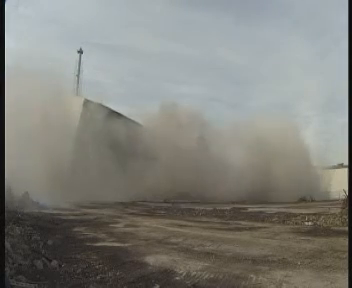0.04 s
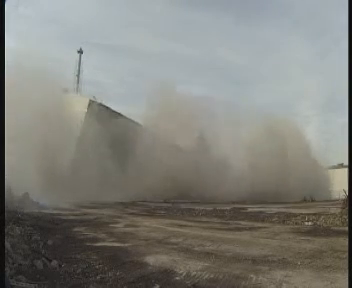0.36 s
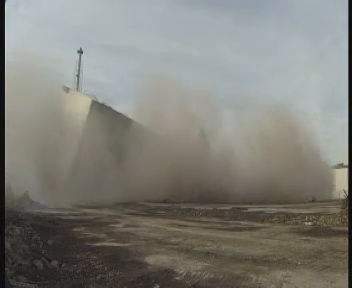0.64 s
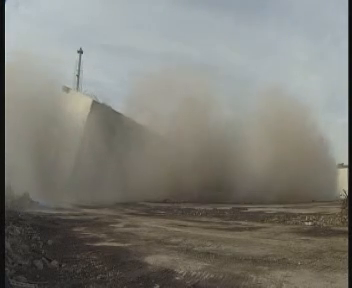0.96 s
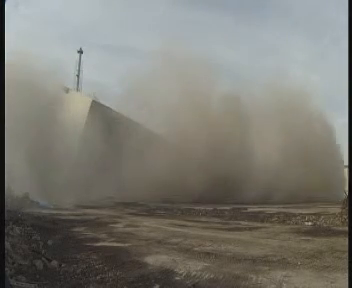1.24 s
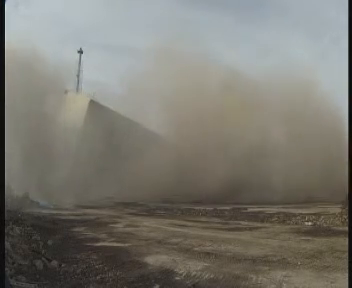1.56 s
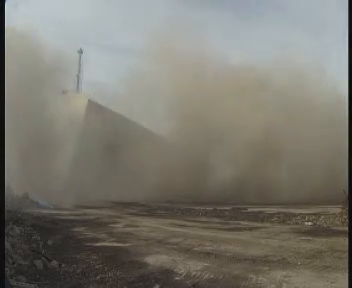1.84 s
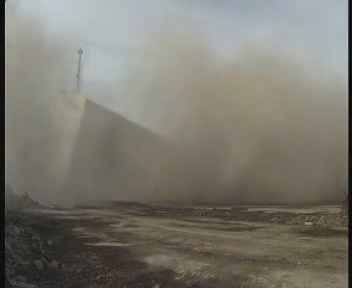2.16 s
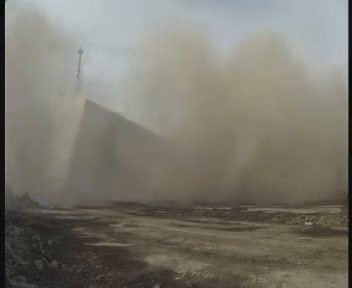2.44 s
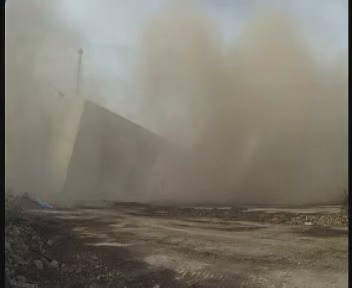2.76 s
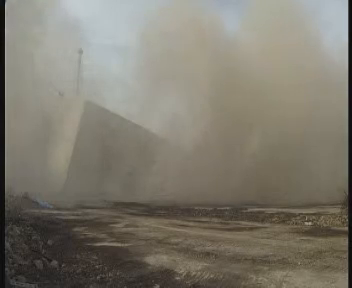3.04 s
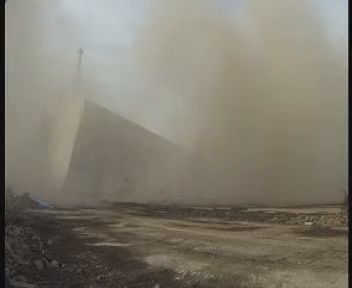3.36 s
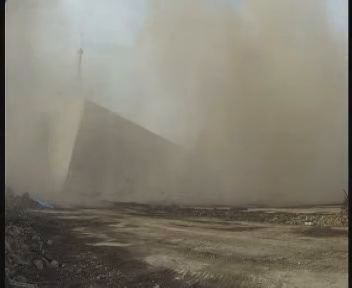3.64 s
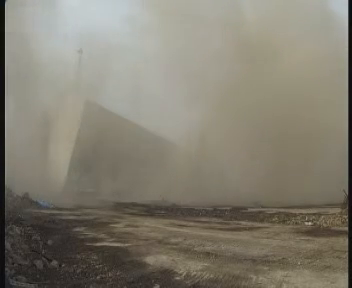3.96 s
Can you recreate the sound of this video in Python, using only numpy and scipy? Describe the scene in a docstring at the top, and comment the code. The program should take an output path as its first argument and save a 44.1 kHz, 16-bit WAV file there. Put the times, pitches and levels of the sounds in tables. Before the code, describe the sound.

Loud roar of a demolished tower falling outdoors, with thuds and rattling debris slowly fading.

```python
"""On an open dirt lot a demolished tower collapses: the ground rumbles, masonry roars, rubble rattles
and bricks clatter, all dying away. Countless impacts superpose into coloured noise; heavy pieces thud
and slabs crash as damped transients, and a few late slides of rubble flare up. One microphone feeds
two tracks: the left overloads at first, the right is held nearly level by a gain control."""
import sys
import numpy as np
from scipy.fft import rfft, irfft, next_fast_len
from scipy.io import wavfile
from scipy.ndimage import uniform_filter1d, map_coordinates

SR = 44100
rng = np.random.default_rng(int(sys.argv[2]) if len(sys.argv) > 2 else 0)


def dump_mix(stems):
    """Bounce the given channels to the path in sys.argv[1] as a 16-bit WAV at rate SR."""
    frames = np.atleast_2d(stems).T  # one column per channel
    limited = np.clip(frames, -1, 1)  # hard clip at full scale
    pcm = np.round(limited * 32767).astype(np.int16)
    wavfile.write(sys.argv[1], SR, pcm)


N = 176400
TIME = np.arange(N) / SR


def amp(db):
    """The decibel scale: 20 dB is a factor of ten in amplitude."""
    return 10 ** (np.asarray(db) / 20)


def wobble(knots_per_s):
    """Slow random modulation: a spline through Gaussian values."""
    return map_coordinates(rng.standard_normal(1024), [TIME * knots_per_s + 2], mode="wrap")


def filtered(x, response):
    """Linear filtering: the spectrum of x is multiplied by a frequency response."""
    size = next_fast_len(N + 8192)
    hz = np.fft.rfftfreq(size, 1 / SR)
    return irfft(rfft(x, size) * response(hz), size)[..., :N]


def coloured(x, spectrum):
    """Spectral shaping: x is weighted by (Hz, dB) points on a log axis, then scaled to rms 1."""
    points_hz, db = np.transpose(spectrum)
    shaped = filtered(x, lambda hz: amp(np.interp(np.log(hz + 1), np.log(points_hz + 1), db)))
    return shaped / np.sqrt(np.mean(shaped ** 2) + 1e-20)


def noise(spectrum):
    """Superposition: countless overlapping impacts add up to Gaussian noise, here of rms 1."""
    return coloured(rng.standard_normal(N), spectrum)


def blows(rows, attack_s, t60_s):
    """Damping: the envelope of each blow rises quickly, then decays exponentially."""
    ages = [(np.maximum(TIME - start, 0), db) for start, db in rows]
    return sum((1 - np.exp(-age / attack_s)) * amp(db - 60 * age / t60_s) for age, db in ages)


def ground():
    """Impact excitation: the ground's rumble decays to a low bed, and heavy pieces thud on it."""
    # Each row: frequency in Hz, relative spectral density in dB.
    spectrum = [(12, -24), (22, -11), (38, -7.5), (65, -2.5), (105, 2), (135, 5), (157, -5.5), (200, -13.5),
                (400, -56.5)]
    # Heavy pieces landing. Each row: start in seconds, level in dB.
    landings = [(.11, -26), (.32, -26), (.70, -18.5), (.86, -25.5), (1.42, -27), (1.68, -24.5),
                (1.8, -27.5), (3.07, -28.5), (3.2, -31), (3.44, -29), (3.88, -49)]
    start_db, fade_db_per_s, bed_db = -21, 8, -40
    rumble = np.hypot(amp(start_db - fade_db_per_s * TIME), amp(bed_db)) * noise(spectrum)
    thuds = blows(landings, attack_s=0.011, t60_s=0.36) * noise(spectrum)
    return rumble + thuds


def bricks():
    """Band-limited noise: the hollow clatter of tumbling bricks swells as the main fall eases."""
    # Each row: frequency in Hz, relative spectral density in dB.
    spectrum = [(400, -36), (620, -9.5), (800, 0.5), (1060, -0.5), (1350, -10.5), (2500, -21), (5000, -67)]
    peak_s, width_s, peak_db, tumble_db = 1.52, 0.67, -18.5, 0.4
    swell = np.exp(-.5 * ((TIME - peak_s) / width_s) ** 2)
    return swell * amp(peak_db + tumble_db * wobble(18)) * noise(spectrum)


def stones():
    """Shot noise: stones of scattered size strike at independent random times, at rms 1."""
    # Each row: frequency in Hz, relative spectral density in dB.
    spectrum = [(400, -25), (1000, -2.5), (1700, 1), (2600, -0.5), (3150, -7), (3900, -9), (4500, -17),
                (5000, -24.5), (5600, -25), (6200, -33.5), (7000, -33.5), (8200, -43), (10000, -54),
                (12000, -71), (15000, -78)]
    stones_per_s, scatter_db = 5000, 3.5
    hits = rng.random(N) < stones_per_s / SR
    polarity = rng.choice([-1, 1], N)
    strength = amp(scatter_db * rng.standard_normal(N))
    return coloured(hits * polarity * strength, spectrum)


def rubble(flow_db):
    """Amplitude modulation: the rattle of small stones fades with the flow and swells in each slide."""
    # Each row: time of the peak in seconds, Gaussian width in seconds, level in dB.
    slides = [(0.051, 0.014, -12.5), (1.722, 0.089, -17), (2.033, 0.066, -21.5), (2.53, .06, -21.5),
              (3.018, 0.053, -26), (3.656, 0.019, -30)]
    offset_db, fade_db_per_s = -7.5, 0.28  # relative to the flow
    rattle = amp(flow_db + offset_db - fade_db_per_s * TIME) * stones()
    swells = sum(amp(db) * np.exp(-.5 * ((TIME - peak) / width) ** 2) for peak, width, db in slides)
    return rattle + swells * stones()


def masonry(flow_db):
    """Incoherent summation: impacts merge into a roar that follows the flow; breaking slabs stand out."""
    # Each row: frequency in Hz, relative spectral density in dB.
    spectrum = [(90, -51), (165, -23), (190, -6.5), (260, -2), (500, 0), (660, -0.5), (840, -0.5),
                (1100, -4.5), (1600, -7.5), (2500, -11.5), (3700, -19), (4600, -28), (6200, -47),
                (10000, -74)]
    # Slabs breaking. Each row: start in seconds, level in dB.
    breaks = [(.255, -5.5), (.375, -8), (.615, -5), (.71, -7.5), (1.055, -9.5), (2.19, -17), (2.74, -18),
              (3.32, -22), (3.63, -20), (3.935, -21.5)]
    offset_db, churn_db = 1, 0.28
    roar = amp(flow_db + offset_db + churn_db * wobble(30.13)) * noise(spectrum)
    crashes = blows(breaks, attack_s=0.0034, t60_s=0.17) * noise(spectrum)
    return roar + crashes


def scene():
    """Linear superposition: the pressures of all sources add at one microphone, which feeds two tracks."""
    # The flow of falling masonry. Each row: time in seconds, level in dB.
    flow = [(0, -5), (.2, -6.5), (.42, -7.4), (.55, -8.5), (.9, -10), (1.17, -10), (1.45, -12.5),
            (1.58, -14.5), (1.75, -12), (2.0, -14.1), (2.3, -15.5), (2.55, -16.5), (2.7, -17.6), (3.0, -19),
            (3.15, -19), (3.45, -20.5), (3.7, -23), (4, -23.5)]
    flow_db = np.interp(TIME, *np.transpose(flow))
    pressure = ground() + masonry(flow_db) + bricks() + rubble(flow_db)
    return np.array([pressure, pressure])


def gain_control(x):
    """Compression: the gain opposes the running mean power, holding the output nearly steady."""
    held_db, reference_db, window_s = -23.5, -15, 0.23  # an input at reference_db leaves at held_db
    slope = 0.096  # dB out per dB in
    power = np.abs(uniform_filter1d(x ** 2, int(window_s * SR)))
    level_db = 10 * np.log10(power + 1e-12)
    return x * amp(held_db + slope * (level_db - reference_db) - level_db)


def record(dry):
    """Limited dynamic range: the left track crackles where it clips, the right is compressed."""
    # The recorder's faint whine. Each row: frequency in Hz, rms level in dB ahead of the gain control.
    tones = [(15622, -83.5)]
    cutoff_hz = 15800
    whine = sum(np.sqrt(2) * amp(db) * np.sin(2 * np.pi * hz * TIME) for hz, db in tones)
    left, right = dry + whine
    tracks = np.array([np.clip(left, -1, 1), gain_control(right)])
    return filtered(tracks, lambda hz: hz < cutoff_hz)


dry = scene()
out = record(dry)
dump_mix(out)
```